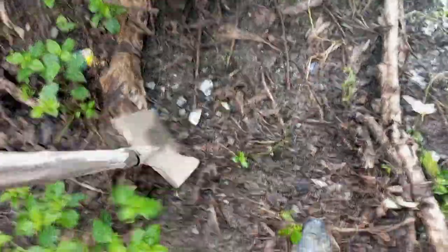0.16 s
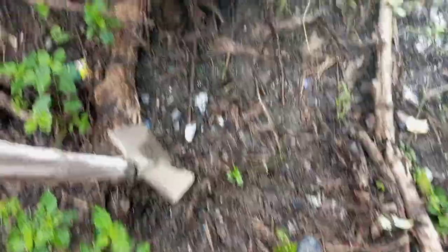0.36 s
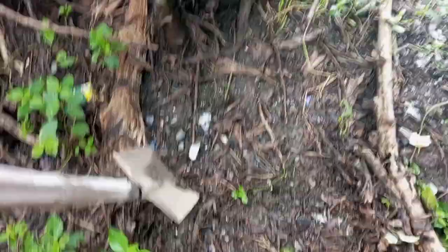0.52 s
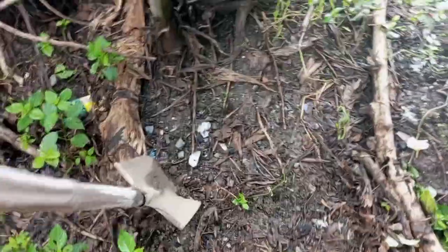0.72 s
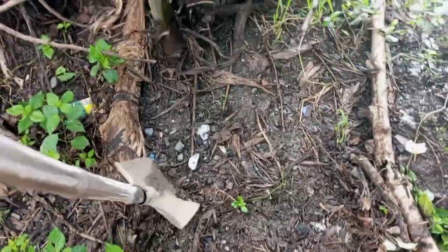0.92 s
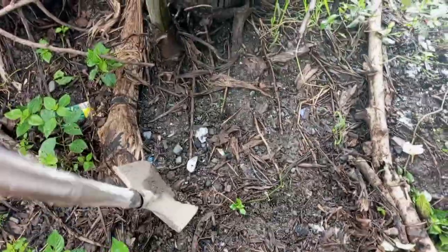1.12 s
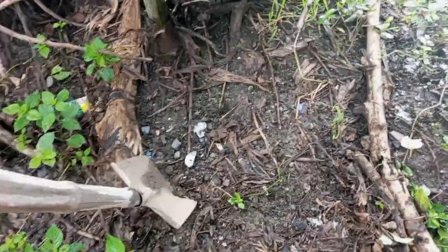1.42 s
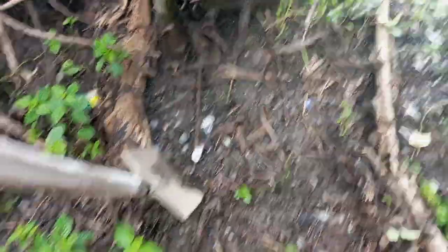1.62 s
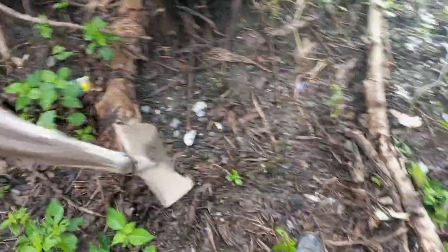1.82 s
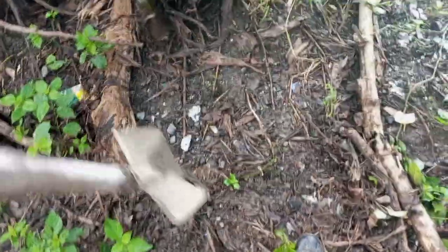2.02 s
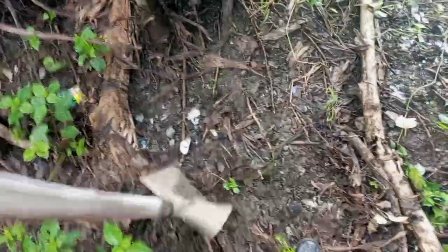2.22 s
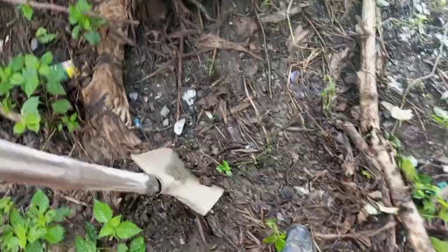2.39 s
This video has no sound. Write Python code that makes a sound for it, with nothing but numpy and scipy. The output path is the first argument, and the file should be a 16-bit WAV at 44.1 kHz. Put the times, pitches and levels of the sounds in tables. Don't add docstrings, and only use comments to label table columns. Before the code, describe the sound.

A steel hoe chops into stony soil close to the microphone at 0.2 s: hard knocks, a brief damped clank, crunching grit and pinging pebbles. Hands rustle and squeak on the handle around 0.4 s; a distant hoarse rooster crows until 1.6 s. Crumbs tick on the blade near 2.1 s, then a second, drier chop lands at 2.3 s. Cicadas, soft hens, surging motor hum and slight wind continue behind.

```python
import sys
import numpy as np
from scipy import signal
from scipy.fft import rfft, irfft, next_fast_len
from scipy.io import wavfile
from scipy.ndimage import uniform_filter1d, map_coordinates

SR = 44100
rng = np.random.default_rng(int(sys.argv[2]) if len(sys.argv) > 2 else 0)


def invert_db(level):
    return 10 ** (np.asarray(level, dtype=float) / 20)


def generate_wav(signal):
    frames = np.transpose(np.atleast_2d(signal))
    scaled = np.clip(frames, -1, 1) * 32767
    pcm = np.round(scaled).astype(np.int16)
    wavfile.write(sys.argv[1], SR, pcm)


N = 112454


def seconds():
    return np.arange(N) / SR


def unit(x):
    return x / np.sqrt(np.mean(x ** 2) + 1e-20)


def along(points, hz):
    f, v = np.transpose(points)
    return invert_db(np.interp(np.log(hz + 1), np.log(f + 1), v))


def wobble(rate):
    knots = rng.standard_normal(int(N * rate / SR) + 4)
    return map_coordinates(knots, [np.arange(N) * rate / SR])


def filtered(x, response):
    m = next_fast_len(N + SR // 2)
    return irfft(rfft(x, m) * response(np.fft.rfftfreq(m, 1 / SR)), m)[..., :N]


def resonances(peaks):
    def response(f):
        return sum((-1) ** k * invert_db(db) * 1j * f * width / (hz * hz - f * f + 1j * f * width)
                   for k, (hz, width, db) in enumerate(peaks))
    return response


def grains(response, grain_db, rate):
    level = invert_db(grain_db * wobble(rate))
    return unit(filtered(rng.standard_normal(N) * level, response))


def swell(centre, half):
    return np.cos(np.pi / 2 * np.clip((seconds() - centre) / half, -1, 1)) ** 2


def swells(rows):
    return sum(invert_db(db) * swell(centre, half) for centre, half, db in rows)


def hoarse(turn, rate):
    level = 1 + 0.4 * wobble(rate)
    return unit(level * np.sin(turn + 0.8 * wobble(rate)))


def struck(events, modes, crack_db, ring_db):
    out, t = np.zeros(N + SR), np.arange(SR // 4) / SR
    for start, db in events:
        ring = 0
        for hz, level, t60 in modes:
            decay = invert_db(level + rng.normal(0, 3.0) - 60 * t / t60)
            ring = ring + decay * np.sin(2 * np.pi * hz * t + 0.56 * rng.normal())
        crack = invert_db(crack_db - 60 * t / 0.013) * rng.standard_normal(len(t))
        rise = 1 - np.exp(-t / 0.0001)
        out[round(start * SR):][:len(t)] += invert_db(db) * (invert_db(ring_db) * ring + crack) * rise
    return out[:N]


# frequency in Hz, width in Hz, level in dB.
CICADA_BANDS = [(6470, 180, -11), (7448, 210, 8.5)]
# time in seconds, level in dB.
CHORUS_SWELL = [(0, 2), (.2, 1.5), (.4, 0), (.62, 1.5), (1.08, 2.5), (1.14, -2.5), (1.19, 3.5),
                (1.25, -0.5), (1.5, 1), (1.65, -4), (1.82, 0), (1.88, -2.5), (1.94, 2.5), (2.02, -4.5),
                (2.26, -0.5), (2.55, -3)]


def cicadas():
    t = seconds()
    buzz = 1 + 0.11 * np.sin(2 * np.pi * 48 * t + 2 * wobble(28))
    pulse_db = -4.9 * np.sin(2 * np.pi * 12 * t + 3.5)
    level = invert_db(-64 + pulse_db + np.interp(t, *np.transpose(CHORUS_SWELL)))
    song = buzz * level * grains(resonances(CICADA_BANDS), grain_db=-1.33, rate=14.12)
    return filtered(song, lambda f: along([(7650, 2), (8000, -33.5), (9000, -66.5)], f))


# centre in seconds, half length in seconds, level in dB.
MOTOR_SURGES = [(0.026, 0.072, -60), (0.145, 0.063, -49.5), (0.327, 0.09, -51.5), (0.442, 0.032, -63),
                (0.552, 0.091, -56.5), (.64, .05, -68.5), (0.767, 0.13, -62.5), (0.868, 0.037, -65.5),
                (0.951, 0.019, -61), (1.051, 0.034, -58), (1.154, 0.071, -69.5), (1.263, 0.045, -67),
                (1.508, 0.096, -61), (1.655, 0.085, -53), (1.857, 0.14, -50.5), (2.02, 0.058, -56),
                (2.15, .07, -70.5), (2.251, 0.065, -58.5), (2.432, 0.064, -71)]
# frequency in Hz, width in Hz, level in dB.
MOTOR_HUM = [(98.4, 3.51, 12), (144, 33, -11), (201.3, 11, -9.5)]


def motor():
    def colour(f):
        return resonances(MOTOR_HUM)(f) / (1 + (f / 260) ** 4) / (1 + (75 / (f + 1)) ** 4)
    hum = grains(colour, grain_db=8.0, rate=8.11)
    hum = hum / np.sqrt(np.abs(uniform_filter1d(hum ** 2, size=2000)) + 0.041)
    return (invert_db(-74.5) + swells(MOTOR_SURGES)) * hum


# frequency in Hz, level in dB per Hz.
AIR_COLOUR = [(76, -33), (130, -7.5), (225, -11), (801, -17.5), (870, -20.5), (2180, -14.5), (4690, -26.5),
              (7000, -20), (9100, -42.5), (15400, -120)]


def open_air():
    level = invert_db(-71 + 0.21 * wobble(12.0))
    return level * grains(lambda f: along(AIR_COLOUR, f), grain_db=1.17, rate=39)


def hiss():
    def colour(f):
        return along([(8000, -2.5), (10500, -9.5), (13000, -6), (15000, 8.5)], f) * (f > 7000)
    return invert_db(-87) * grains(colour, grain_db=3.0, rate=22)


# centre in seconds, half length in seconds, level in dB.
WIND_PUFFS = [
    (0.02, 0.11, -60),
    (0.31, 0.2, -70),
    (1.497, 0.055, -56.5),
    (1.826, 0.13, -65.5),
]


def wind():
    colour = [(22, -20.0), (63, 4.5), (90, -10), (400, -42.0), (2000, -120)]
    return (invert_db(-81.0) + swells(WIND_PUFFS)) * grains(lambda f: along(colour, f), grain_db=0.0, rate=15)


# centre in seconds, half length in seconds, body in dB, sizzle in dB.
HAND_MOVES = [(.0, 0.029, -61, -69), (0.165, 0.14, -69.5, -85), (0.344, 0.081, -55.5, -78),
              (0.467, 0.084, -57.5, -56.5), (0.642, 0.023, -80, -74), (0.731, 0.035, -77, -81),
              (0.78, .012, -70, -80), (.83, 0.078, -67.5, -79), (0.968, 0.076, -67, -71),
              (1.03, 0.032, -83, -72.5), (1.221, 0.046, -65, -74), (1.28, .036, -70.5, -77.5),
              (1.556, .05, -66, -70.5), (1.669, 0.017, -75, -77), (1.842, 0.062, -61.5, -77),
              (2.407, 0.069, -54.5, -99)]
# frequency in Hz, level in dB per Hz.
CLOTH_COLOUR = [(240, -47.5), (400, -31.5), (1560, -36), (1740, -8.5), (4170, -7), (7440, -2),
                (10000, -60.5), (13000, -83), (22000, -120)]
# frequency in Hz, level in dB per Hz.
SIZZLE_COLOUR = [(5000, -27), (8500, -14), (8890, -15), (10300, -21.5), (14900, 4.5), (16000, -5)]
# frequency in Hz, width in Hz, level in dB.
PALM_SQUEAK = [(5574, 120, 7), (6420, 270, -1), (7460, 460, -4.5)]


def rustles():
    body = swells([(s, half, db) for s, half, db, _ in HAND_MOVES])
    high = swells([(s, half, db) for s, half, _, db in HAND_MOVES])
    cloth = body * grains(lambda f: along(CLOTH_COLOUR, f), grain_db=-3.5, rate=510)
    sizzle = high * grains(lambda f: along(SIZZLE_COLOUR, f), grain_db=1.5, rate=99)
    squeak = grains(lambda f: resonances(PALM_SQUEAK)(f) * (f < 8600), grain_db=1.5, rate=100)
    return cloth + sizzle + invert_db(-49.5) * swell(0.4745, 0.075) * squeak


# centre in seconds, half length in seconds, frequency in Hz,
# width in Hz, level in dB.
BRUSHES = [
    (0, 0.041, 2510, 670, -54),
    (0.057, 0.075, 6630, 503, -58),
    (0.085, 0.065, 4830, 800, -69.5),
    (0.202, 0.05, 5170, 1200, -58.5),
    (0.208, 0.06, 2440, 503, -63),
    (1.199, .02, 6800, 890, -58.5),
    (1.821, 0.017, 5900, 890, -63),
    (1.84, 0.016, 5900, 1490, -69),
    (1.92, .008, 6230, 500, -76),
    (2.113, 0.033, 3020, 1204, -75.5),
]


def brushes():
    out = np.zeros(N)
    for centre, half, hz, width, db in BRUSHES:
        colour = resonances([(hz, width, 0)])
        out += invert_db(db) * swell(centre, half) * grains(lambda f: colour(f) ** 2 * (f < 8000), grain_db=0, rate=360)
    return out


# centre in
# seconds, length in seconds, pitch in Hz, level in dB.
HEN_NOTES = [(.02, .08, 810, -69), (.085, .03, 2200, -67), (.375, .06, 3270, -62), (.512, .08, 1380, -65),
             (.51, .13, 2880, -65), (.53, .07, 4190, -67), (1.24, .1, 4600, -71), (1.47, .1, 1350, -74),
             (1.45, .06, 3170, -74), (1.51, .08, 870, -74), (1.52, .08, 500, -73), (1.6, .1, 3170, -76),
             (1.69, .1, 1180, -77), (1.745, .09, 800, -72), (1.83, .08, 1200, -75), (1.868, .07, 1790, -70),
             (1.86, .06, 3640, -72), (1.89, .12, 810, -73), (2.17, .06, 2120, -75), (1.63, .06, 2300, -74),
             (2.455, .16, 2190, -59), (2.43, .16, 1640, -71), (1.83, .09, 2600, -69),
             (1.45, .07, 1680, -64), (1.845, .1, 600, -77)]


def hens():
    t, out = seconds(), np.zeros(N)
    for centre, length, hz, db in HEN_NOTES:
        turn = 2 * np.pi * hz * (t - 0.23 * (t - centre) ** 2)
        out += invert_db(db + 3.0) * swell(centre, length / 2) * hoarse(turn, 0.048 * hz + 40)
    return out


# start in seconds, peak in dB.
KNOCKS = [
    [(0.2072, -23.5), (0.2092, -6.5), (0.2144, -11.5), (0.2274, -10.5)],
    [(2.2944, -15), (2.2982, -9), (2.3084, -13.5), (2.3164, -10), (2.3304, -21)],
]
# start in seconds, crunch in dB, fade in dB per second,
# time until it stops in seconds, extra fade from then in dB per second.
CHOPS = [
    (0.2075, -23.5, 148, 0.082, 286),
    (2.293, -22, 234, 0.077, 140),
]
# frequency in Hz, level in dB, T60 in seconds.
BLADE_MODES = [
    [(758, 3.5, 0.026), (1960, 0.5, 0.027), (2090, 2, 0.043), (2598, 3, 0.077), (3660, -5.5, 0.07),
     (4170, -3, 0.072), (5190, -2.5, 0.01), (5900, -9, .04), (7020, -16, .04), (7540, -15.5, 0.03)],
    [(421, 11, 0.075), (715, 8.5, 0.02), (2106, -1, 0.022), (2410, -6, 0.036), (2910, -2, 0.016),
     (3520, -4.5, 0.023), (4170, -3, 0.019), (5910, -3, 0.047), (6830, -7, 0.029), (6910, -6, .04)],
]
# frequency in Hz, level in dB per Hz.
GRIT_COLOURS = [
    [(150, -52.5), (430, -20), (1140, -14), (2400, -4.5), (5800, -2), (7600, -4), (8800, -28), (11000, -36)],
    [(150, -66), (400, -42), (1160, -17), (2130, -6), (5700, -5), (7300, -4), (9200, -26.5), (11500, -40)],
]


def hoe():
    t, out = seconds(), np.zeros(N)
    for chop, colour, knocks, modes in zip(CHOPS, GRIT_COLOURS, KNOCKS, BLADE_MODES):
        start, db, fade_db, stop, stopped_db = chop
        knock = struck(knocks, modes, crack_db=-4.5, ring_db=-15)
        out += filtered(knock, lambda f: along(colour, f) ** 0.8)

        since = np.clip(t - start, 0, None)
        fade = fade_db * since + stopped_db * np.clip(since - stop, 0, None)
        rise = 1 - np.exp(-since / 0.0048)
        blade = resonances([(hz, 111.3, level) for hz, level, _ in modes])
        crunch = grains(lambda f: along(colour, f), grain_db=1.2, rate=700)
        through_blade = grains(lambda f: along(colour, f) * blade(f), grain_db=2.5, rate=170)
        out += invert_db(db - fade) * rise * (crunch + invert_db(-6.5) * through_blade)

        spit = grains(lambda f: along(SIZZLE_COLOUR, f) ** 0.7, grain_db=2, rate=300)
        out += invert_db(db - 18.5 - 1.1 * fade) * rise * spit
    return out


# start in seconds, frequency in Hz, level in dB.
STONE_PINGS = [(0.2089, 3600, -24), (0.2093, 2110, -17), (0.2137, 3650, -34), (0.214, 4250, -19),
               (0.214, 7540, -25), (0.2142, 5860, -22), (0.2155, 2080, -25), (0.2155, 5200, -25),
               (0.2167, 6900, -25), (0.2245, 3540, -25), (0.2253, 2025, -22.5), (0.2271, 5210, -20),
               (0.2285, 3460, -33), (0.2291, 1775, -27), (0.251, 5900, -30), (0.2583, 6940, -31.5),
               (2.2965, 2010, -23), (2.2964, 2850, -25), (2.2994, 6950, -24), (2.3016, 2200, -25.5),
               (2.3057, 6960, -25), (2.3081, 3630, -42), (2.31, 4250, -30.5), (2.3103, 6020, -27),
               (2.3112, 6780, -25.5), (2.315, 6040, -32), (2.3204, 3920, -37), (2.3219, 6530, -33),
               (2.3255, 5650, -34), (2.329, 6800, -34), (2.3317, 5050, -35), (2.3324, 5560, -31.5),
               (2.3458, 6030, -36), (2.3502, 4950, -33)]


def stones():
    out, t = np.zeros(N + SR), np.arange(SR // 20) / SR
    envelope = invert_db(5.5 - 60 * t / 0.022) * (1 - np.exp(-t / 0.00078))
    phases = rng.uniform(0, 2 * np.pi, len(STONE_PINGS))
    for (start, hz, db), phase in zip(STONE_PINGS, phases):
        out[round(start * SR):][:len(t)] += invert_db(db) * envelope * np.sin(2 * np.pi * hz * t + phase)
    return out[:N]


# start in seconds, end in seconds, second partial in Hz, its level in dB,
# level of the fourth partial in dB.
CROW_NOTES = [
    (0.292, 0.483, 1767, -66, -58.5),
    (0.422, 0.58, 1694, -69.5, -78),
    (0.766, 0.885, 1869, -68.5, -67),
    (0.878, 1.114, 1824, -64.5, -86),
    (1.151, 1.476, 1763, -64.5, -101),
    (1.412, 1.634, 1697, -64.5, -90),
]


def cock():
    t, out = seconds(), np.zeros(N)
    for start, end, hz, db, top_db in CROW_NOTES:
        pitch = hz - 209 * np.clip(t - start, 0, end - start)
        turn = np.pi * np.cumsum(pitch) / SR
        gate = np.clip(np.minimum(t - start, end - t) / 0.043, 0, 1)
        low = invert_db(db - 17.5) * hoarse(turn, 68)
        middle = invert_db(db) * hoarse(2 * turn, 110)
        top = invert_db(top_db) * hoarse(4 * turn, 230)
        out += gate * (low + middle + top)
    return out


# start in seconds, peak in dB.
CRUMB_TICKS = [
    (1.6744, -58),
    (1.7629, -59),
    (1.8407, -49),
    (2.0775, -54),
    (2.0803, -38.5),
    (2.093, -59.5),
    (2.1309, -63),
    (2.1405, -55),
]
# frequency in Hz, level in dB, T60 in seconds.
CRUMB_MODES = [(1040, -6, 0.011), (2200, -3, 0.02), (3750, -1.5, 0.02), (4990, -11, 0.01)]


def crumbs():
    ticks = struck(CRUMB_TICKS, CRUMB_MODES, crack_db=-7, ring_db=-4)
    colour = [(300, -43), (700, -2.5), (1000, 0), (5000, 2), (6500, -32.5), (9000, -77.5)]
    return filtered(ticks, lambda f: along(colour, f))


def scene():
    background = cicadas() + motor() + open_air() + hiss() + wind()
    handling = rustles() + brushes()
    digging = hoe() + stones() + crumbs()
    return (background + handling + hens() + digging + cock())[None]


def roll_off(x):
    return signal.sosfilt(signal.butter(12, 16830, fs=SR, output="sos"), x)


def record(dry):
    mix = filtered(dry, lambda hz: np.clip((15700 - hz) / 250, 0, 1) ** 2)
    return roll_off(mix)


dry = scene()
out = record(dry)
generate_wav(out)
```